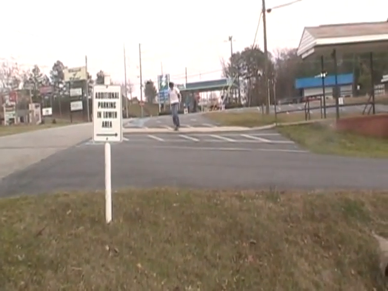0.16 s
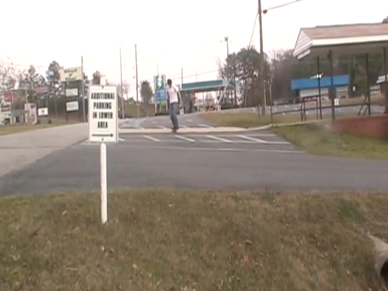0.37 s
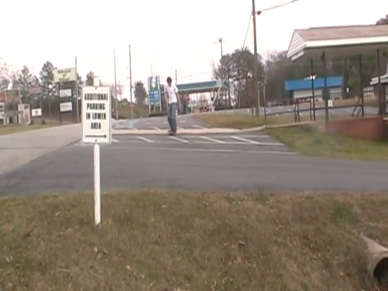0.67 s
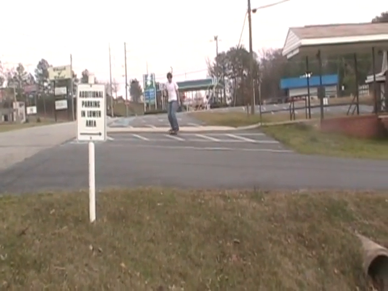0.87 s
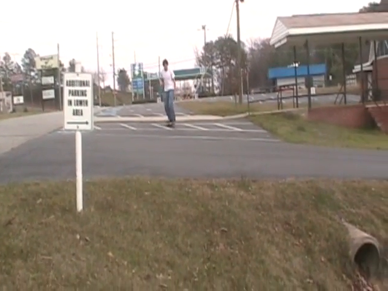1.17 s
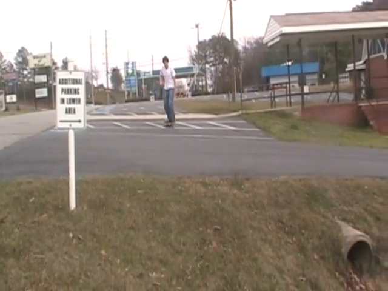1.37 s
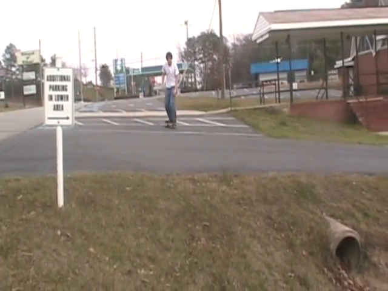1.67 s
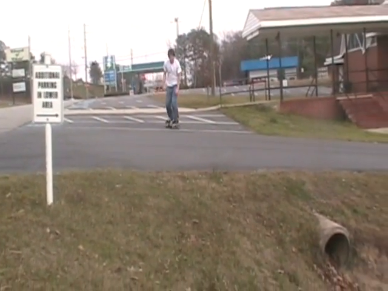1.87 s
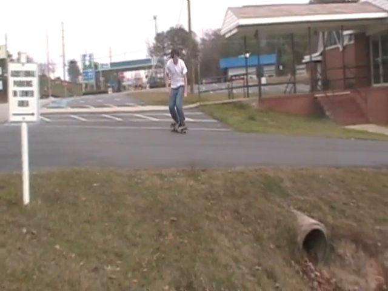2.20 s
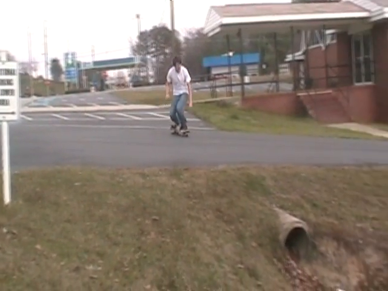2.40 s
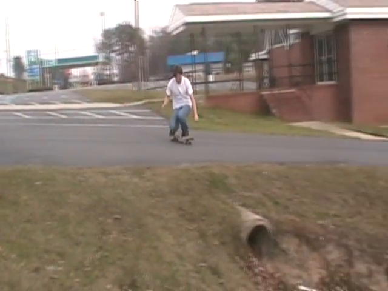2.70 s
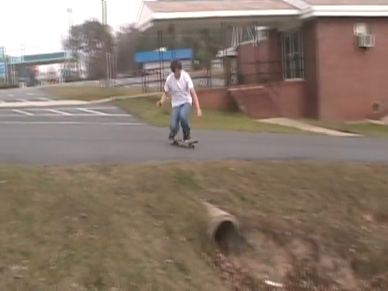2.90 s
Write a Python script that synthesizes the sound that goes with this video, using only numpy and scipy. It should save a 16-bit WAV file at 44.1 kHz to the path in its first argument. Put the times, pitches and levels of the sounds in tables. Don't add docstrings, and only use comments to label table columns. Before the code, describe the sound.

A skateboard rolls continuously on rough asphalt, its gritty rumble and metallic rattle broken by irregular clacks. Clacks come near 0.3 and 0.47 seconds, the hardest at 0.56, with rougher rolling and a thin axle ring around 0.8. After 1 second it is steadier and hissier, with hollow deck resonances from 2. Wind buffets the stereo microphone throughout; a low traffic drone lies behind, and a faint bird chirps at 0.2.

```python
import sys
import numpy as np
from scipy import signal
from scipy.fft import rfft, irfft, next_fast_len
from scipy.io import wavfile
from scipy.ndimage import uniform_filter1d

SR = 44100
rng = np.random.default_rng(int(sys.argv[2]) if len(sys.argv) > 2 else 0)


def transcribe(signal):
    frames = np.atleast_2d(signal).T
    limited = np.clip(frames, -1, 1)
    pcm = np.round(limited * 32767).astype(np.int16)
    wavfile.write(sys.argv[1], SR, pcm)


def level_to_linear(level):
    exponent = np.asarray(level, float) / 20
    return 10 ** exponent


N = 134505


def in_time(rows):
    s, *columns = np.transpose(rows)
    return [np.interp(np.arange(N) / SR, s, column) for column in columns]


def rms_one(x):
    return x / np.sqrt(np.mean(x ** 2) + 1e-20)


def drift(rate):
    hop, settle = 40, 2000
    r = np.exp(-80 * np.pi * rate / SR)
    white = rng.standard_normal(N // hop + settle + 2)
    slow = signal.lfilter([1], [1, -2 * r, r * r], white)[settle:]
    return np.interp(np.arange(N) / hop, np.arange(len(slow)), rms_one(slow))


def colour(x, spectrum):
    hz, db = np.transpose(spectrum)
    bins_hz = np.linspace(1, SR / 2, N // 2 + 1)
    gain = level_to_linear(np.interp(np.log(bins_hz), np.log(hz), db, left=-80, right=-80))
    return irfft(rfft(x) * rms_one(gain), N)


def resonate(x, hz, width_hz):
    hz = np.broadcast_to(hz, N)
    r = np.exp(-np.pi * width_hz / SR)
    out, state = np.zeros(N), np.zeros(2)
    step = 256 if np.ptp(hz) else N
    for i in range(0, N, step):
        poles = [1, -2 * r * np.cos(2 * np.pi * hz[i] / SR), r * r]
        out[i:i + step], state = signal.lfilter([1, 0, -1], poles, x[i:i + step], zi=state)
    return out * (1 - r * r) / np.sqrt(2 * np.pi * width_hz / SR)


def evened(x, window_s):
    steadiness = .6
    power = uniform_filter1d(x ** 2, size=int(window_s * SR)) + .05 * np.mean(x ** 2)
    return rms_one(x / power ** (steadiness / 2))


def grains(per_s, spread_db):
    size = level_to_linear(spread_db * np.minimum(rng.exponential(1, N), 5)) * rng.choice([-1, 1], N)
    return rms_one(size * (rng.random(N) < per_s / SR))


def board():
    # t/s, roughness level/dB, hiss level/dB re roughness
    roughness = [(0, -53.5, -25), (.12, -52.5, -1), (.3, -47.5, -9), (.45, -46.5, -6.5), (.53, -41.5, -21),
                 (.66, -45.5, -14), (.78, -41.5, -1.5), (.9, -42, -5), (1.14, -47.5, 1), (1.29, -49, -2),
                 (1.45, -46, -1.5), (1.6, -46, -2.5), (1.75, -46.5, 0), (2.05, -47, 0.5), (2.2, -47.5, 2.5),
                 (2.45, -49, 2.5), (2.74, -49.5, 3.5), (3.05, -48.5, 2.5)]
    level_db, hiss_db = in_time(roughness)
    grit = road_grit()
    rolling = level_to_linear(level_db) * grit
    plain, bright, middle = cracks()
    ringing = trucks(rolling, plain, middle) + deck(grit, plain) + axle(plain)
    return ringing + clack(middle) + hiss(rolling * level_to_linear(hiss_db), bright)


def road_grit():
    jolt = level_to_linear(1.42 * drift(39))
    return jolt * rms_one(grains(3000, 3.5) + 1.11 * rng.standard_normal(N))


def cracks():
    # t/s, peak level/dB, brightness/dB, length/s
    crack_rows = [(0.012, -30, -33, 0.0063), (0.105, -28, -12, 0.0041), (0.121, -35, -3, 0.0044),
                  (0.197, -45, 5, .004), (.274, -29, -6, 0.0065), (0.281, -24.5, -10, 0.0065),
                  (.346, -38, -7, .004), (0.469, -29, 4, 0.0022), (.471, -22, -3, 0.0084),
                  (0.515, -34, -4, 0.0062), (.558, -39, 1, 0.0022), (0.5589, -15, -15, 0.0038),
                  (0.5638, -15.5, -16, 0.0055), (0.574, -34, -4, .005), (0.693, -34, 4, 0.0064),
                  (0.752, -34.5, 4.5, 0.0082), (0.827, -30, -4, 0.0046), (0.831, -30, -1, 0.0042),
                  (.851, -37, 3, .005), (0.862, -37, -2, 0.0043), (0.918, -33, -2, .005),
                  (0.966, -35, 0, 0.0044), (1.009, -29, -4, .005), (1.077, -36, 2, 0.0059),
                  (1.207, -46, 0, .004), (1.51, -28, -7, 0.01), (1.543, -39, 2, .004),
                  (1.552, -25, -15, 0.0064), (1.59, -37, 4, 0.0081), (1.61, -31, 1, .005),
                  (1.651, -41, -2, 0.0048), (1.771, -31, -2, .006), (1.893, -28.5, -2, .005),
                  (1.951, -28.5, -8, 0.0071), (2.13, -27.5, 2, 0.0044), (2.144, -29, -19, 0.0069),
                  (2.164, -31, 1, 0.0093), (2.242, -33, -8, 0.005), (2.288, -30.5, -9, 0.0059),
                  (2.4, -34, -11, .006), (2.572, -35, 3, .005), (2.595, -40.5, 9, 0.01),
                  (2.637, -33, -3, .007), (2.814, -38, 2, .005), (2.828, -40, 0, 0.0062)]
    rise_s, tail_s, tail_db = .003, .078, -17.5
    knock_db, level_db = 14, -10.5
    t, noise, out = np.arange(N) / SR, rng.standard_normal(N), np.zeros((3, N))
    for s, db, bright_db, length_s in crack_rows:
        age = np.maximum(t - s + rise_s, 0)
        fade = np.exp(-(age / length_s) ** 2) + level_to_linear(tail_db) * np.exp(-age / tail_s)
        rattle = np.minimum(age / rise_s, 1) * fade * noise
        knock = level_to_linear(knock_db) * (np.arange(N) == int(s * SR))
        tilt = level_to_linear([[0], [bright_db], [0.69 * bright_db + 5]])
        out += level_to_linear(db + level_db) * tilt * (rattle + knock)
    return out


def trucks(rolling, plain, middle):
    # f/Hz, width/Hz, level/dB
    modes = [(825, 44, -15.5), (1218, 350, 1.5), (1726, 160, 2), (2050, 182, 1.5), (2277, 260, 0),
             (2614, 460, -3), (3244, 344, -0.5), (3900, 2020, -6.5)]
    # t/s, level/dB
    weight = [(0, 3.5), (.5, -4), (.85, -1.5), (1.0, -1), (1.3, -1), (1.55, 0), (1.75, 2.5), (2.0, 1.5),
              (2.4, 1.5), (3.05, -1.5)]
    low_drive = level_to_linear(in_time(weight)[0]) * rolling + level_to_linear(-4) * plain
    drives = [low_drive] * 3 + [rolling + plain] * 2 + [rolling + middle] * 3
    out = np.zeros(N)
    for k, (hz, width_hz, db) in enumerate(modes):
        gain = (-1) ** k * level_to_linear(db - 7.5) * np.sqrt(width_hz / 300)
        out += gain * resonate(drives[k], hz, width_hz)
    return out


def deck(grit, plain):
    # t/s, f/Hz, level/dB
    flexing = [(0, 597, -60.5), (.35, 640, -52), (.58, 504, -52.5), (.9, 465, -50), (1.25, 427, -55),
               (1.4, 526, -61), (1.6, 630, -52), (1.98, 626, -48), (2.13, 628, -41.5), (2.22, 630, -48),
               (2.54, 568, -51.5), (2.6, 530, -42.5), (2.68, 540, -47.5), (2.78, 500, -48.5),
               (2.83, 562, -39.5), (2.9, 487, -44.5), (2.96, 565, -46.5), (3.05, 500, -45)]
    # t/s, f/Hz, level/dB
    nose = [(0, 720, -68), (1.6, 725, -63), (2.05, 720, -49), (2.2, 719, -47), (2.4, 682, -39.5),
            (2.57, 696, -50), (2.63, 684, -60), (2.84, 654, -48.5), (3.05, 634, -45)]
    hz, db = in_time(flexing)
    rolled = level_to_linear(db + 7.5) * evened(resonate(resonate(grit, hz, 91), hz, 320), .03)
    struck = level_to_linear(-20.5) * resonate(resonate(plain, hz, 150), hz, 510)
    nose_hz, nose_db = in_time(nose)
    upper = level_to_linear(nose_db) * evened(resonate(resonate(grit, nose_hz, 45), nose_hz, 140), 0.055)
    return rolled + struck + upper


def axle(plain):
    # t/s, f/Hz, level/dB
    ring = [(0, 2140, -53), (.3, 2110, -60), (.6, 2170, -57), (.78, 2130, -39), (.86, 2420, -49),
            (.92, 2100, -48), (.97, 2450, -48), (1.08, 2220, -46.5), (1.25, 2340, -56), (1.4, 2230, -80),
            (2.2, 2160, -50), (3.05, 2100, -65)]
    hz, db = in_time(ring)
    kept_going = level_to_linear(db) * evened(resonate(rng.standard_normal(N), hz, 220), 0.029)
    return kept_going + level_to_linear(-17) * resonate(plain, 2050, 490)


def clack(middle):
    # f/Hz, level/dB per Hz
    clack_spectrum = [(350, -20), (700, 9), (2000, 25), (5000, 4), (9000, -36), (14500, -39)]
    return level_to_linear(-10) * colour(middle, clack_spectrum)


def hiss(rubbing, bright):
    # f/Hz, level/dB per Hz
    hiss_spectrum = [(2500, -52), (4000, 0), (5500, 4.5), (7000, 7), (8600, 5.5), (10500, 7), (12000, 3.5),
                     (14400, -36)]
    return colour(rubbing * rng.choice([-1, 1], N) + bright, hiss_spectrum)


def wind():
    # t/s, level/dB, pan to the left/dB (left minus right is about half of it),
    # brightness/dB
    gusts = [(0, -37, -19, -3.5), (.1, -38.5, 8.5, -6.5), (.21, -40.5, 4, 11), (.33, -28, -6, -4),
             (.42, -34.5, -9, 0.5), (.6, -32.5, 7.5, 1.5), (.85, -34.5, -7.5, -5), (1.02, -31, -0.5, 3),
             (1.2, -33.5, -36, -5), (1.33, -37, -1, 0), (1.5, -31, -5.5, 1), (1.62, -32, -11, -2),
             (1.75, -32, 1, 1), (2.05, -32.5, 4.5, -2), (2.18, -35, -10.5, 8.5), (2.3, -32, -2, -1),
             (2.65, -33, -9.5, -1), (3.05, -36, -8, -5)]
    # f/Hz, level/dB per Hz
    left_port = [(25, -29), (60, -11), (130, 1.5), (230, -4), (400, -12.5), (700, -16.5), (1200, -28.5),
                 (3000, -43)]
    # f/Hz, level/dB per Hz
    right_port = [(25, -24), (60, -22), (150, -1.5), (280, 2.5), (450, -5.5), (800, -15), (1500, -22.5),
                  (3000, -59)]
    gust_db, pan_db, bright_db = in_time(gusts)
    lowpass = signal.butter(1, 200, fs=SR, output="sos")
    out = []
    for side, spectrum in ((0.25, left_port), (-0.24, right_port)):
        db = gust_db + side * pan_db + 2.5 * drift(32.5)
        eddies = colour(grains(380, 2.42) + 0.71 * rng.standard_normal(N), spectrum)
        low = signal.sosfilt(lowpass, eddies)
        high = eddies - low
        high_db = bright_db + 0.18 * (db - db.mean())
        out.append(level_to_linear(db - 2) * (low * level_to_linear(-bright_db) + high * level_to_linear(high_db)))
    return np.array(out)


def road():
    # t/s, level/dB
    drone_level = [(0, -42), (.4, -38.5), (.5, -33.5), (.62, -34), (.72, -37), (.9, -35), (1.08, -32.5),
                   (1.16, -34), (1.3, -40), (1.5, -37.5), (1.62, -36), (1.72, -41), (2.15, -38),
                   (3.05, -50.5)]
    # f/Hz, level/dB per Hz
    wash_spectrum = [(30, -19.5), (80, -4.5), (150, -8.5), (400, -10), (1000, -20.5), (3000, -32.5),
                     (12000, -43)]
    hum = resonate(resonate(rng.standard_normal(N), 132, 24), 132, 111)
    drone = level_to_linear(in_time(drone_level)[0]) * evened(hum, 0.053)
    return drone + level_to_linear(-41.5) * colour(rng.standard_normal(N), wash_spectrum)


def bird():
    # t/s, f/Hz, level/dB
    chirp = [
        (.185, 3600, -75),
        (.195, 3900, -53),
        (.21, 4400, -52),
        (.218, 4650, -49),
        (.227, 4200, -51),
        (.233, 3900, -75),
    ]
    hz, db = in_time(chirp)
    sounding = db > db.min()
    return level_to_linear(db) * sounding * np.sqrt(2) * np.sin(2 * np.pi * np.cumsum(hz) / SR)


def ports(x):
    # f/Hz, phase/rad
    port_phase = [(0, 0), (1000, -.4), (2200, -.45), (5600, -1.0), (8600, -2.2), (11700, -3.1),
                  (13000, -3.2)]
    # f/Hz, left minus right/dB
    port_balance = [(100, -4), (1000, -1.4), (3000, -0.8), (7000, -1), (9000, -1.5), (10500, -3),
                    (11800, -1.4)]
    # delay/s, level/dB
    echo_rows = [
        [(.0041, -16.5), (.013, -22), (.022, -18), (.031, -17), (.047, -18), (.066, -19)],
        [(.0053, -20), (.017, -18), (.027, -16), (.037, -15), (.053, -16), (.074, -18)],
    ]
    padded = next_fast_len(N + SR // 8)
    hz = np.linspace(0, SR / 2, padded // 2 + 1)
    phase = np.interp(hz, *np.transpose(port_phase))
    balance_db = np.interp(hz, *np.transpose(port_balance))
    half = np.exp(.5j * phase) * level_to_linear(.5 * balance_db)
    dulling = 1 + (hz / 16900) ** 4
    echo = []
    for side in echo_rows:
        returns = sum(level_to_linear(db) * np.exp(-2j * np.pi * hz * s) for s, db in side)
        echo.append(1 + returns / dulling)
    return irfft(rfft(x, padded) * [half, 1 / half] * echo, padded)[:, :N]


def scene():
    return ports(board() + road() + bird()) + wind()


def low_pass(x):
    return signal.sosfilt(signal.butter(12, 14500, fs=SR, output="sos"), x)


def record(dry):
    top = .4
    mix = top * np.tanh(dry / top)
    return low_pass(mix)


dry = scene()
out = record(dry)
transcribe(out)
```